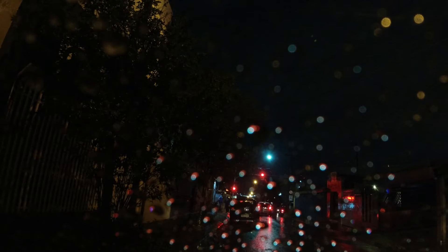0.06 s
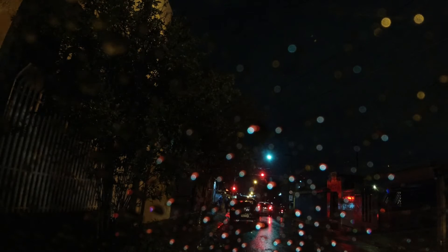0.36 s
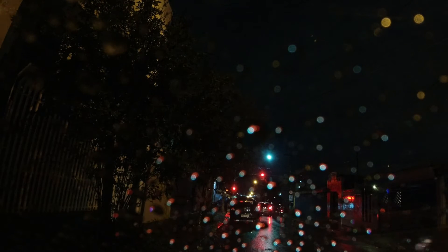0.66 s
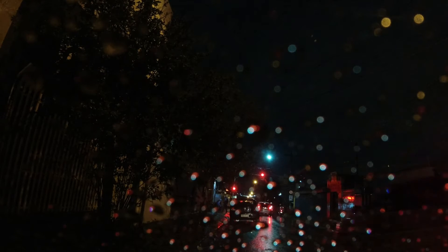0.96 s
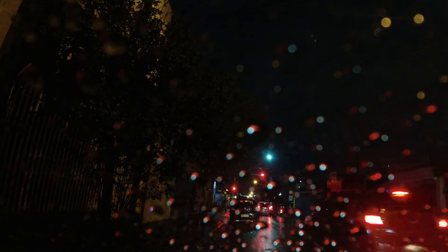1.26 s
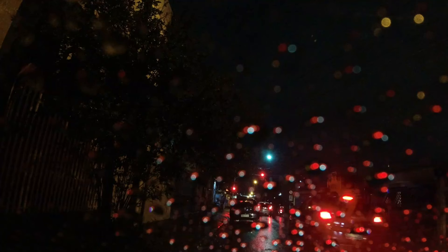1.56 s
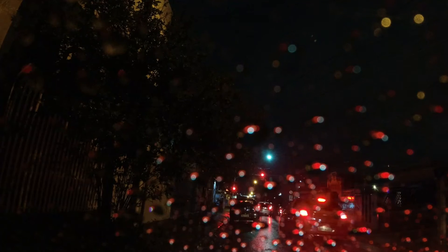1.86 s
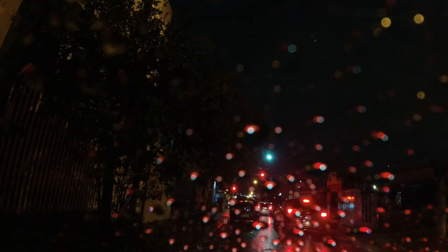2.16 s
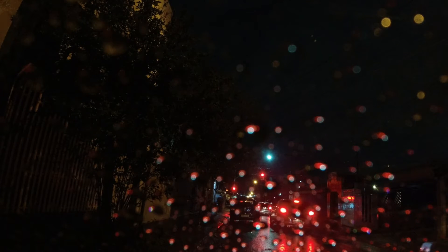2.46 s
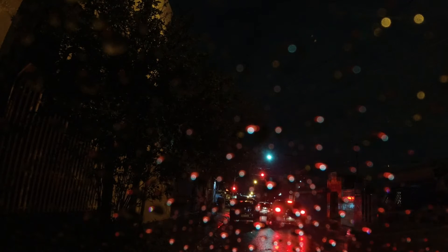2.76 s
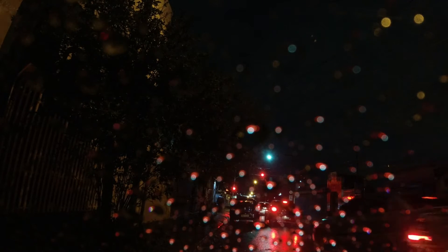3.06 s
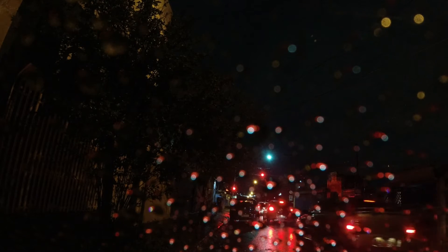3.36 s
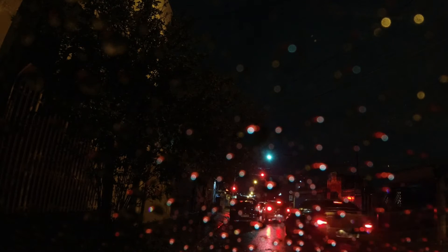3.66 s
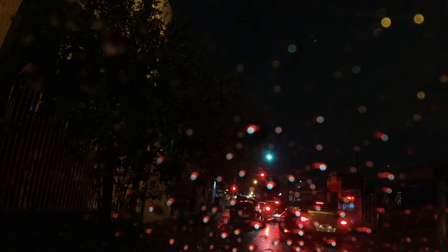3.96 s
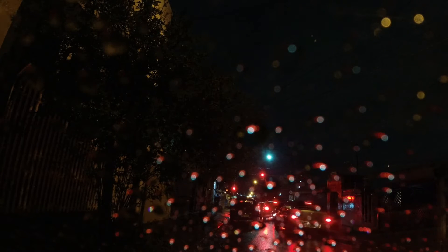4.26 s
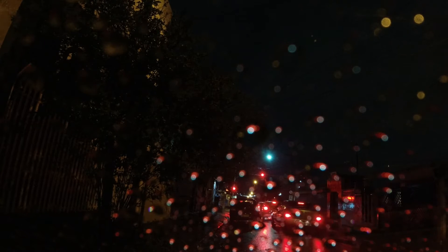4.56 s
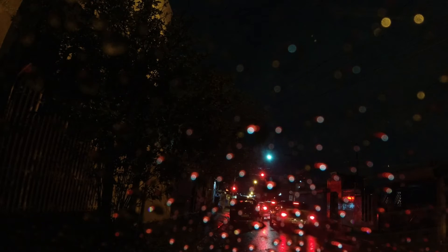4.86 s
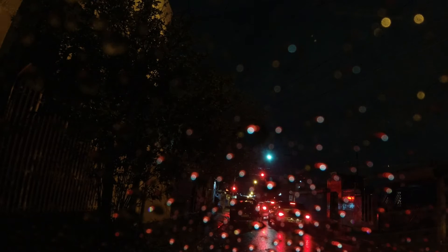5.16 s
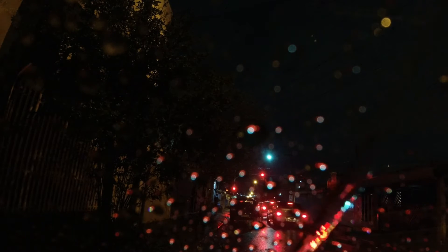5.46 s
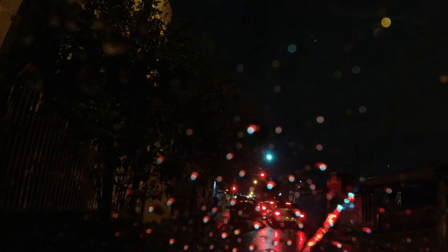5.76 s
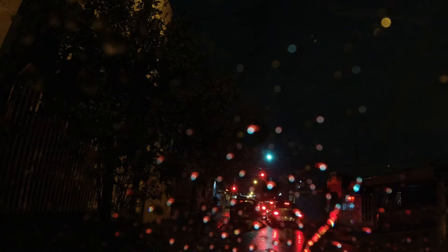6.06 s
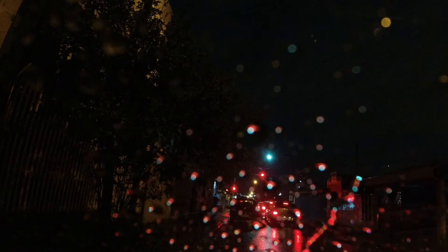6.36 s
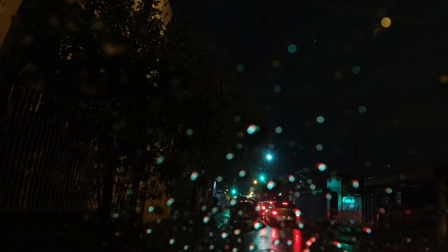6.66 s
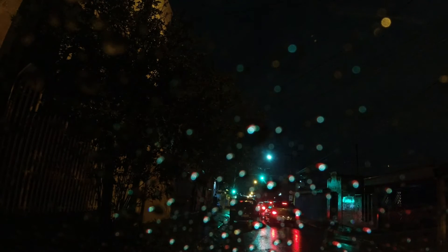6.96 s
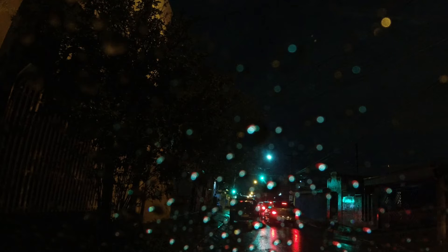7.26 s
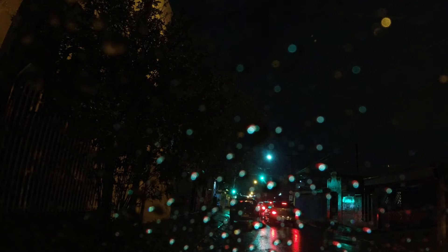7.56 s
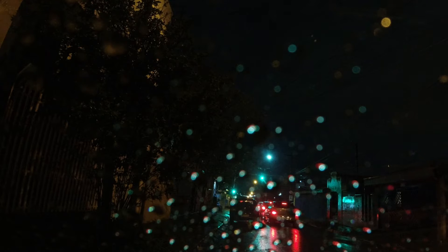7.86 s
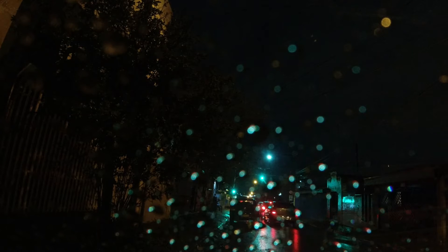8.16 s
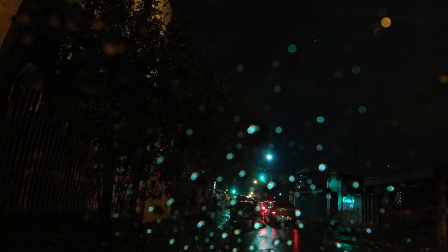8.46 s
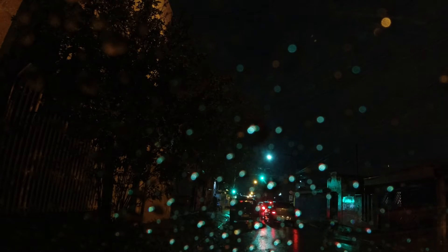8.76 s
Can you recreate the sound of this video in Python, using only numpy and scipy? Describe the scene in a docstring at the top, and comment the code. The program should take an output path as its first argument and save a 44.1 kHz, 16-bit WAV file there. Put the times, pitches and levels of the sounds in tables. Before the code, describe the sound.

Muffled cars drive by on a wet road, heard from inside a closed car whose engine hums at idle. Light rain falls on the roof and windscreen throughout, with scattered brighter taps from heavier drops. As the traffic eases, a loud knock strikes the body. After a quieter stretch of idling and rain comes a second knock, then a brief low groan, a sharp drop and a dull double thud.

```python
"""An idling engine hums through the cabin of a car that waits at a junction on a rainy night.
Its firing drives the air and panels at harmonics of the firing rate. Other cars pull past on the wet
road with swells of engine hum, exhaust, tyre roar and spray. Fine rain patters on the shell and
single drops, light and heavy, excite its modes; two loud knocks ring the panels, and near the end
come a short low groan and a soft double thud."""
import sys
import numpy as np
from scipy import signal
from scipy.fft import rfft, irfft, next_fast_len
from scipy.io import wavfile
from scipy.ndimage import uniform_filter1d, map_coordinates

SR = 44100
rng = np.random.default_rng(int(sys.argv[2]) if len(sys.argv) > 2 else 0)


def store_wav(level_fs):
    """Save 16-bit WAV to argv[1]."""
    pcm = np.round(np.clip(np.atleast_2d(level_fs), -1, 1) * 32767)
    wavfile.write(sys.argv[1], SR, pcm.T.astype(np.int16))


N = 396900

# spectrum of splashing water, on the road and on the windscreen: f/Hz, level/dB
SPLASH_SPECTRUM = [(500, -35.5), (1000, 5.5), (1500, -1), (2000, 1), (2400, 2.5), (3400, 0), (3900, -2.5),
                   (4600, -6), (5200, -14.5), (6300, -25.5), (9000, -40.5)]


def engine_hum():
    """Forced vibration: engine hum, from this car and from cars passing, shakes the cabin and its panels."""
    # swells of low engine hum, from this car and from cars passing:
    # start t/s, end t/s, attack t/s, then level/dB of shake, boom and buzz
    hum_swells = [(.1, .9, 0.23, -60, -44, -60.5), (1.419, 1.552, 0.073, -45, -55, -56),
                  (1.498, 1.81, 0.046, -62, -42.5, -49), (1.988, 2.23, 0.24, -44, -33.5, -57),
                  (2.3, 2.869, 0.29, -49, -29.5, -39.5), (2.898, 3.155, 0.14, -45, -35.5, -41),
                  (3.2, 3.673, 0.095, -42, -62.5, -49), (3.496, 3.92, 0.11, -49, -42.5, -52.5),
                  (4.294, 5.337, 0.17, -61, -58, -55.5), (5.949, 6.303, 0.038, -44.5, -51, -48.5),
                  (7.796, 8.3, .2, -60.5, -61, -49), (8.25, 8.6, 0.71, -40, -46.5, -52)]
    # panel buzz: multiple of the firing rate, level/dB
    buzz_orders = [(6, -6), (7, -1)]
    rest_db = [-59, -64, -61]  # shake, boom, buzz
    firing_hz = idle_rate()
    swells = [(swell(start, end, attack, release=0.13), dbs) for start, end, attack, *dbs in hum_swells]
    shake_db, boom_db, buzz_db = power_sum(rest_db, swells)
    shake = amp(shake_db + 0.8 * wobble(5.4)) * tone(firing_hz)
    boom = amp(boom_db + 0.8 * wobble(13)) * tone(2 * firing_hz)
    # the fourth order sits on an air mode of the cabin and changes less than the panels do
    air_db = -59 + 0.35 * (buzz_db - rest_db[2])
    air = amp(air_db + 2.7 * wobble(8.8)) * tone(4 * firing_hz + 1.1 * wobble(10))
    buzz = sum(amp(db + 2.2 * wobble(12)) * tone(order * firing_hz + 1.3 * wobble(18))
               for order, db in buzz_orders)
    return shake + boom + air + amp(buzz_db) * buzz


def idle_rate():
    """Frequency modulation: the firing rate hunts at random and sags briefly under each load."""
    # sags: lowest point t/s, half width t/s, depth f/Hz
    sags = [(4.25, 0.13, 0.56), (4.95, 0.16, 0.89), (6.0, 0.5327, 1.1), (8.4, 0.35, 0.94)]
    idle_hz, hunt_hz = 29.63, 0.069
    t = np.arange(N) / SR
    sag_hz = sum(depth * np.exp(-((t - s) / width) ** 2) for s, width, depth in sags)
    return idle_hz + hunt_hz * wobble(3.047) - sag_hz


def traffic():
    """Spherical spreading: rumble, tyre roar and spray swell as each car nears and fade as it leaves."""
    # passes: nearest t/s, half width t/s, then level/dB of rumble, roar and spray
    passes = [(.52, 0.39, -46.5, -49.5, -61), (1.55, 0.41, -55, -53.5, -64.5),
              (2.55, 0.61, -47.5, -54, -65.5), (3.701, .3, -52.5, -69, -73.5), (6.2, .2, -70, -64, -73.5),
              (7.5, 0.081, -51, -56, -78), (8.27, 0.43, -47.5, -56, -74)]
    # spectra of road rumble and tyre roar: f/Hz, level/dB
    rumble_spectrum = [(12, -21.5), (30, -8.5), (50, -2), (78, 1), (105, -7), (150, -7.5), (200, -0.5),
                       (260, -22.5), (400, -69.5)]
    roar_spectrum = [(120, -29), (200, 0), (255, 3), (300, 1.5), (340, -5.5), (440, -1.5), (560, -5),
                     (640, -5.5), (850, -17), (1300, -28.5), (2500, -35.5), (5000, -69)]
    # tyres in standing water: t/s, level/dB, half width t/s, centre f/Hz
    swishes = [(0.089, -62.5, 0.088, 2660), (0.98, -64, 0.24, 2400), (1.124, -63.5, 0.2, 3300),
               (1.248, -68.5, 0.46, 2460), (1.416, -66, 0.13, 3400), (6.192, -69, 0.063, 1830)]
    street_db, steepness = [-59, -64, -76], 3.83  # levels between passes; exponent of the fade
    t = np.arange(N) / SR
    swells = [(1 / np.sqrt(1 + np.abs((t - s) / width) ** steepness), dbs) for s, width, *dbs in passes]
    rumble_db, roar_db, spray_db = power_sum(street_db, swells)
    rumble = amp(rumble_db + 2.5 + 4.2 * wobble(7.1)) * rush(rumble_spectrum)
    roar = amp(roar_db + 0.5 + wobble(14)) * rush(roar_spectrum)
    hum = tyre_hum()
    spray = amp(spray_db + 1.5 + wobble(40)) * rush(SPLASH_SPECTRUM)
    spray += amp(3) * hisses(swishes, octaves=0.37)
    return exhaust() + rumble + roar + hum + spattered(spray)


def exhaust():
    """Pulsating flow: other cars drone in harmonics on the throttle; the pitch drops at a gear change."""
    # firing rate of one car and then the next: t/s, f/Hz
    firing_rate = [(.2, 33.41), (.4, 33.95), (.55, 39.75), (.65, 40.48), (.9, 41.23), (1.0, 32.8),
                   (1.2, 32.1), (1.48, 31.28), (2, 32.7), (2.65, 34.76), (4.1, 31.82)]
    # harmonics that reach the cabin: multiples of the firing rate
    orders = [1, 2, 3, 6]
    # spells on the throttle: start t/s, end t/s, attack t/s, release t/s, then level/dB of each order
    throttle = [(0.148, 0.412, .025, 0.083, -34.5, -41, -48.5, -58),
                (0.428, 0.756, 0.053, 0.11, -35.5, -39.5, -49, -64),
                (.53, 0.876, .03, 0.028, -39, -64, -41.5, -62),
                (.98, 1.47, 0.02, 0.047, -49, -44.5, -60, -51),
                (2.202, 2.95, 0.41, 0.57, -40, -55, -55, -62)]
    # spectrum of the throaty growl: f/Hz, level/dB
    growl_spectrum = [(70, -24.5), (150, 3), (240, 0.5), (620, -7.5), (1100, -48.5)]
    firing_hz, = curves(firing_rate)
    spells = [(swell(start, end, attack, release), dbs) for start, end, attack, release, *dbs in throttle]
    levels = power_sum([-120] * len(orders), spells)
    drone = sum(amp(db + 1.3 * wobble(17)) * tone(order * firing_hz + 0.8 * wobble(15))
                for order, db in zip(orders, levels))
    # every firing also blows a puff of noise out of the pipe
    puffs = unit(np.maximum(tone(firing_hz), 0) ** 2 * rush(growl_spectrum))
    return drone + amp(levels[0] - 18.5) * puffs


def tyre_hum():
    """Cavity resonance: the air inside passing tyres hums at a wavering pitch."""
    # course of the hum: t/s, f/Hz, level/dB
    cavity_tone = [(0, 275.3, -56.5), (.55, 299.5, -51), (1.0, 297.4, -55.5), (1.7, 267, -72),
                   (2.05, 286, -54.5), (2.7, 294, -60.5), (3.4, 293, -86)]
    hz, db = curves(cavity_tone)
    return amp(db + 2.8 * wobble(13)) * tone(hz + 5 * wobble(30))


def spattered(spray):
    """Random modulation in time and frequency: thrown water comes in brief clumps, each with its pitch."""
    depth_db = 2.6
    spectra = signal.stft(spray, nperseg=512)[2]
    clumps = uniform_filter1d(rng.standard_normal(spectra.shape[1:]), size=3, axis=0)
    clumps = uniform_filter1d(clumps, size=7, axis=1)
    return signal.istft(spectra * amp(depth_db * unit(clumps)), nperseg=512)[1][:, :N]


def rain():
    """Impact excitation: fine rain sounds dull on the roof and bright on the glass; some drops stand out."""
    # spectrum of the roof under rain: f/Hz, level/dB
    roof_spectrum = [(210, -37), (350, -1.5), (484, -8), (649, -0.5), (938, -8.5), (1150, -13),
                     (1260, -9.5), (1620, -13), (1960, -12.5), (3520, -18), (4660, -31.5), (6060, -42),
                     (10300, -120)]
    roof = patter(roof_spectrum, patches=8, per_second=44, scatter_db=3, t60=.08, level_db=-63.5)
    windscreen = patter(SPLASH_SPECTRUM, patches=3, per_second=5, scatter_db=2.5, t60=.045, level_db=-77.5)
    return roof + windscreen + drops(t60=0.037, splash_t60=0.093)


def patter(spectrum, patches, per_second, scatter_db, t60, level_db):
    """Shot noise: random hits, per_second on each patch of shell, convolved with its impulse response."""
    t = np.arange(SR // 20) / SR
    out = np.zeros((2, N))
    for _ in range(patches):
        hits = rng.random(N) < per_second / SR
        strength = amp(scatter_db * np.minimum(rng.standard_normal(N), 1.5))
        response = rng.standard_normal((2, len(t))) * amp(-60 * t / t60) * (1 - np.exp(-t / 0.0012))
        out += signal.oaconvolve((hits * strength)[None], response, axes=1)[:, :N]
    return amp(level_db) * spread(out, lambda hz: amp(along(spectrum, hz)) * cabin(hz))


def drops(t60, splash_t60):
    """Damped free vibration: a drop rings the spot it hits; the more it splashes, the more other modes ring."""
    # single drops: t/s, level/dB, pitch f/Hz, relative splash level/dB
    impacts = [(0.084, -64, 1750, 6), (1.152, -61, 3320, -4), (1.392, -50.5, 1006, -16),
               (1.839, -43, 2066, -21), (2.499, -67, 1690, 6.5), (2.726, -60, 794, -7),
               (2.808, -60, 1895, -1.5), (4.203, -51, 1495, -7), (4.242, -69, 2470, 3),
               (4.381, -68, 2000, 1), (4.481, -69, 2970, 0), (4.559, -54, 696, -12),
               (4.671, -68.5, 2360, 3), (4.748, -69, 3120, -1), (5.017, -50, 723, -5),
               (5.465, -55, 508, 2.5), (6.184, -63, 1860, -2), (6.427, -65, 2930, 0),
               (6.632, -60, 1190, -3), (6.925, -47, 1450, -9), (6.984, -69, 2650, 0.5),
               (7.575, -61.5, 1750, 5.5), (7.673, -52.5, 1290, -21), (7.765, -49, 850, 0),
               (8.337, -51, 3290, 2), (8.339, -35.5, 1387, -15), (8.341, -33, 941, -6.5),
               (8.456, -53, 4770, -18)]
    # other modes: ratio to the pitch, level/dB over the splash
    modes = [(.45, 4.5), (.68, 0.5), (1.28, -4), (1.4, -11.5), (2, -17)]
    # transmission through roof and glass: f/Hz, level/dB
    transmission = [(3600, 4.5), (4800, -6), (6000, -25), (9000, -56)]
    out, t = np.zeros((2, N)), np.arange(SR // 8) / SR
    for s, db, hz, splash_db in impacts:
        phases = rng.normal(0, 0.14, (len(modes), 2, 1))
        others = sum(amp(level + splash_db) * np.sin(2 * np.pi * hz * ratio * t + phase)
                     for (ratio, level), phase in zip(modes, phases))
        ring = np.sin(2 * np.pi * hz * t) + others
        add(out, s, amp(db) * ring * amp(-60 * t / t60) * (1 - np.exp(-t / 0.0011)))
        add(out, s, amp(db) * clatter([(hz, splash_db, splash_t60)], rise_cycles=3.7, octaves=0.69))
    return filtered(out, lambda hz: amp(along(transmission, hz)))


def knocks():
    """Modal superposition: a hard blow gives a panel ring, a hollow clatter, a crack and a brittle snap."""
    # blows: t/s, then level/dB of ring, body, crack and snap, favoured f/Hz
    blows = [(3.505, -26, -27, -37, -40.5, 295), (3.509, -23.5, -21.5, -40, -60.5, 292),
             (3.526, -27, -43, -53, -69.5, 630), (3.575, -43, -38, -49, -60.5, 650),
             (3.634, -45, -43, -57, -63, 605), (7.387, -23.5, -26.5, -35, -37, 178.3),
             (7.403, -33.5, -41, -59, -63, 739)]
    # panel modes: f/Hz, level/dB, t60/s
    panel_modes = [(180.7, -2.5, 0.28), (290.5, -6.5, 0.11), (334, -14.5, 0.42), (394.3, -6.5, 0.27),
                   (635, -10.5, 0.26), (728, -6, 0.08), (830, -15.5, 0.13), (1055, -19, 0.09),
                   (1710, -15, 0.051), (2000, -18.5, 0.068)]
    # dense ringing of the body, the crack and the first contact: centre f/Hz, level/dB, t60/s
    body_bands = [(148, 1.5, 0.19), (242, 3.5, 0.22), (490, -0.5, 0.2), (665, -5.5, 0.22),
                  (1080, -15.5, 0.22)]
    crack_bands = [(1246, 1, 0.086), (1704, -1, 0.13), (1990, -0.5, 0.093), (2800, -17, 0.24),
                   (3340, -4, 0.096), (4570, -14.5, 0.094), (6960, -36, 0.064)]
    snap_bands = [(2420, 5.5, 0.054), (3400, 3.5, .05), (4130, -17, 0.027), (8500, -39, .04)]
    out, t = np.zeros((2, N)), np.arange(SR // 2) / SR
    for s, ring_db, body_db, crack_db, snap_db, spot_hz in blows:
        ring = np.zeros(len(t))
        for hz, db, t60 in panel_modes:
            # the spot that is struck favours the modes near one pitch
            favour_db = 8 * np.exp(-(np.log2(hz / spot_hz) / 0.12) ** 2)
            ring += amp(db + favour_db - 60 * t / t60) * np.sin(2 * np.pi * (hz * t + rng.random()))
        add(out, s, amp(ring_db) * ring * (1 - np.exp(-t / 0.0033)))
        add(out, s, amp(body_db) * clatter(body_bands, rise_cycles=6.3, octaves=0.5))
        add(out, s, amp(crack_db) * clatter(crack_bands, rise_cycles=2.1, octaves=0.2))
        add(out, s, amp(snap_db) * clatter(snap_bands, rise_cycles=9.4, octaves=0.24))
    return out


def thuds():
    """Soft impact: a heavy bump gives a few low cycles of falling pitch, and trim rattles after it."""
    # bumps: t/s, peak level/dB, starting f/Hz, fall/(octaves per s), length t/s
    bumps = [(8.067, -37, 177.5, 0.83, 0.048), (8.58, -20.5, 161, 2.2, 0.032),
             (8.612, -30.5, 187.3, 2.9, 0.069), (8.644, -20.5, 171, 21, 0.038), (8.695, -32, 92, 4, 0.055),
             (8.952, -39, 113, 0.97, 0.038)]
    # dull rattle: centre f/Hz, level/dB, t60/s
    rattle_bands = [(177, -10.5, 0.28), (358, -20, 0.19), (540, -26.5, 0.36), (1197, -39.5, 0.41),
                    (2140, -35.5, 0.16), (3500, -50.5, 0.4)]
    out = np.zeros((2, N))
    for s, db, hz, fall, length in bumps:
        t = np.arange(int(length * SR)) / SR
        envelope = np.abs(np.sin(np.pi * t / length)) ** 0.65
        pitch_hz = hz * 2 ** (-fall * t)
        add(out, s, amp(db) * envelope * np.sin(2 * np.pi * np.cumsum(pitch_hz) / SR))
        add(out, s + .008, amp(db) * clatter(rattle_bands, rise_cycles=1.6, octaves=0.53))
    return out


def brief_hisses():
    """Narrow-band noise: brief soft hisses lead into the knocks and follow the later hits."""
    # bursts of hiss: t/s, level/dB, half width t/s, centre f/Hz
    bursts = [(3.5, -54.5, .006, 3380), (7.383, -50, 0.0066, 1900), (8.329, -54, 0.0063, 1965),
              (8.4, -64, 0.064, 1980), (8.603, -69, 0.01, 4660), (8.603, -58, 0.013, 2070)]
    return hisses(bursts, octaves=0.22)


def groan():
    """Resonance: a low tone swells, glides and fades, with a weaker partial a fifth below."""
    # groans: loudest t/s, half width t/s, level/dB, f/Hz, glide/(Hz per s)
    groans = [(1.999, 0.062, -45.5, 120.9, -14), (7.619, 0.059, -42.5, 119.9, 18.5),
              (8.23, 0.11, -35, 119.1, -14), (8.53, 0.15, -45.5, 100.7, -55)]
    t, out = np.arange(N) / SR, np.zeros(N)
    for s, width, db, hz, glide in groans:
        pitch_hz = hz + glide * (t - s)
        envelope = amp(db) * np.exp(-((t - s) / width) ** 2)
        out += envelope * (tone(pitch_hz) + amp(-14) * tone(pitch_hz * 2 / 3))
    return out


def whine():
    """Gated pure tones: a very faint electronic whine sounds twice, high in the treble."""
    # whistles: start t/s, end t/s, level/dB
    whistles = [(3.036, 3.15, -74), (8.886, 8.993, -77.5)]
    t = np.arange(N) / SR
    gate = sum(amp(db) * np.clip(np.minimum(t - start, end - t) / .01, 0, 1) for start, end, db in whistles)
    return gate * (tone(np.full(N, 13830)) + amp(-11) * tone(np.full(N, 9927)))


def background_hiss():
    """Broadband noise: a faint, steady hiss lies under everything."""
    # spectrum of the hiss: f/Hz, level/dB
    hiss_spectrum = [(1000, 2), (7000, 2), (9500, 1.5), (13000, -3), (16000, -9)]
    return amp(-88.5) * rush(hiss_spectrum)


def cabin(hz):
    """Resonant transmission: the windows favour two bands, and crowded standing waves ripple the gain."""
    # resonances of the windows: f/Hz, level/dB
    glass = [(1650, 0.5), (2030, 1), (2300, 0), (2750, 0), (3300, 2.5), (3650, 1.5), (3820, -2.5),
             (4200, -0.5)]
    spacing_hz, ripple_db = 55, 1.7
    knots = rng.standard_normal((2, SR // spacing_hz))
    ripple = np.array([map_coordinates(k, [hz / spacing_hz]) for k in knots])
    return amp(along(glass, hz) + ripple_db * ripple * np.clip(hz / 1500, 0, 1))


def spread(pair, gain):
    """Interaural coherence: two unrelated signals become coloured stereo of rms 1, mono in the bass."""
    # likeness of left and right: f/Hz, correlation
    coherence = [(100, 0.99), (700, 0.94), (1250, 0.64), (2050, 0.49), (2550, -0.35), (3000, -0.54),
                 (3350, -0.43), (3650, -0.2), (4300, -0.035)]
    angle = lambda hz: np.arccos(np.clip(along(coherence, hz), -1, 1)) / 2
    mid, side = filtered(pair, lambda hz: gain(hz) * np.array([np.cos(angle(hz)), np.sin(angle(hz))]))
    return unit(np.array([mid + side, mid - side]))


def clatter(bands, rise_cycles, octaves):
    """Modal overlap: crowded modes act as noise bands that swell over a few cycles and die away."""
    t = np.arange(SR // 3) / SR
    out = np.zeros((2, len(t)))
    for centre, db, t60 in bands:
        band = lambda hz: np.exp(-(np.log2((hz + 1) / centre) / octaves) ** 2)
        noise = spread(rng.standard_normal((2, len(t))), band)
        envelope = amp(-60 * t / t60) * (1 - np.exp(-t * centre / rise_cycles))
        out += amp(db) * unit(noise * envelope) * np.sqrt(np.mean(envelope ** 2))
    return out


def hisses(rows, octaves, flutter_db=2):
    """Amplitude modulation: narrow bands of noise flutter as they swell and fade."""
    out, t = np.zeros((2, N)), np.arange(2 * SR) / SR - 1
    for s, db, width, centre in rows:
        band = lambda hz: cabin(hz) / (1 + (np.log2((hz + 1) / centre) / octaves) ** 4)
        hiss = spread(rng.standard_normal((2, len(t))), band)
        burst = amp(db + flutter_db * wobble(40)[:len(t)]) * np.exp(-(t / width) ** 2) * hiss
        add(out, s - 1, burst[:, max(round((1 - s) * SR), 0):])
    return out


def rush(spectrum):
    """Spectral shaping: steady stereo noise of rms 1, coloured by the cabin."""
    return spread(rng.standard_normal((2, N)), lambda hz: amp(along(spectrum, hz)) * cabin(hz))


def tone(hz):
    """Phase as the integral of frequency: a sine of rms 1 that follows a pitch curve."""
    return np.sqrt(2) * np.sin(2 * np.pi * (np.cumsum(hz) / SR + rng.random()))


def swell(start, end, attack, release):
    """Envelope: a linear rise, a hold until the end, then exponential decay."""
    t = np.arange(N) / SR
    return np.clip((t - start) / attack, 0, 1) * np.exp(-np.maximum(t - end, 0) / release)


def power_sum(rest_db, events):
    """Incoherent addition: each layer's level/dB at rest plus all (gain curve, layer levels) events."""
    power = amp(rest_db)[:, None] ** 2 + sum((amp(dbs)[:, None] * gain) ** 2 for gain, dbs in events)
    return 10 * np.log10(power)


def wobble(rate):
    """Spline interpolation: a smooth random curve, rate knots a second."""
    return map_coordinates(rng.standard_normal(int(N * rate / SR) + 4), [np.arange(N) * rate / SR])


def curves(rows):
    """Linear interpolation: one value per sample for each column after the time."""
    s, *cols = np.transpose(rows)
    return [np.interp(np.arange(N) / SR, s, c) for c in cols]


def along(points, hz):
    """Interpolation of (f/Hz, value) points on a log axis."""
    f, v = np.transpose(points)
    return np.interp(np.log(hz + 1), np.log(f + 1), v)


def filtered(x, response):
    """Linear filtering: the spectrum of x times a frequency response."""
    size = x.shape[-1]
    padded = next_fast_len(size + 8192)
    return irfft(rfft(x, padded) * response(np.fft.rfftfreq(padded, 1 / SR)), padded)[..., :size]


def add(track, s, sound):
    """Superposition: mix a sound into the track at time s."""
    part = track[:, max(round(s * SR), 0):][:, :sound.shape[-1]]
    part += sound[..., :part.shape[1]]


def amp(db):
    """Decibels to amplitude ratio."""
    return 10 ** (np.asarray(db) / 20)


def unit(x):
    """Normalisation to rms 1."""
    return x / np.sqrt(np.mean(x ** 2) + 1e-20)


def scene():
    """Superposition of all sources, as heard from the front seat."""
    rainfall = rain()
    bumps = knocks() + thuds() + brief_hisses()
    return engine_hum() + traffic() + rainfall + bumps + groan() + whine() + background_hiss()


def record(dry):
    """Windowing and band limiting: the sound eases in and out and loses its highest treble."""
    fade_s, top_hz = .004, 15700
    t = np.arange(N) / SR
    ease = np.clip(np.minimum(t, t[-1] - t) / fade_s, 0, 1)
    return filtered(dry * ease, lambda hz: hz < top_hz)


dry = scene()
out = record(dry)
store_wav(out)
```